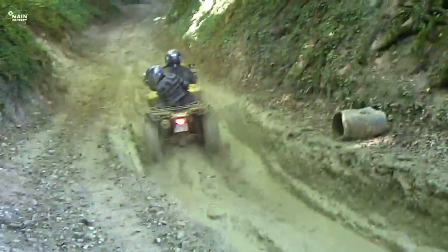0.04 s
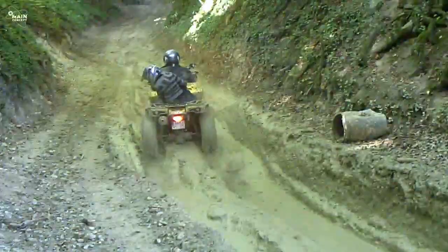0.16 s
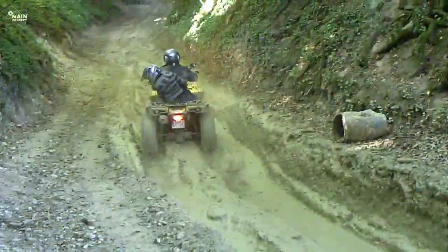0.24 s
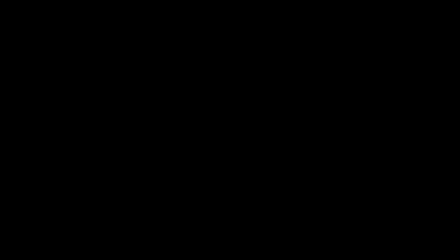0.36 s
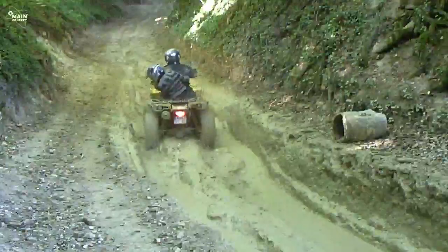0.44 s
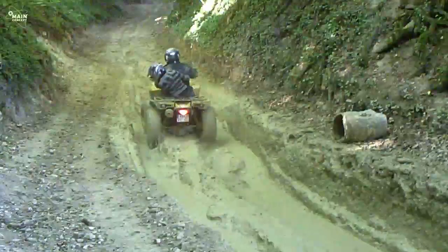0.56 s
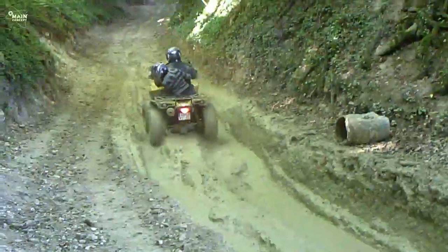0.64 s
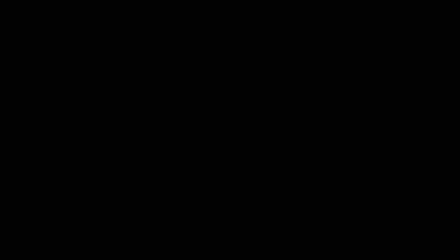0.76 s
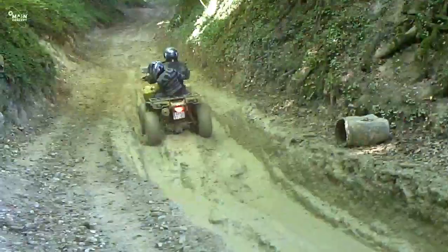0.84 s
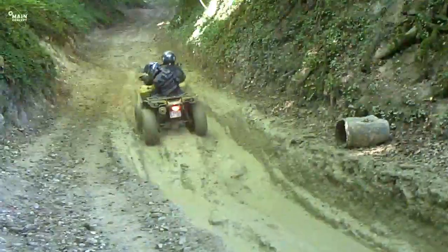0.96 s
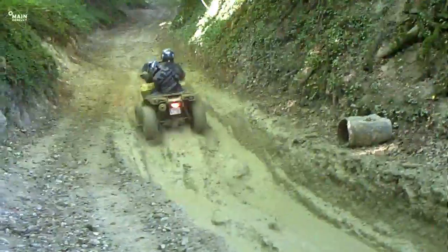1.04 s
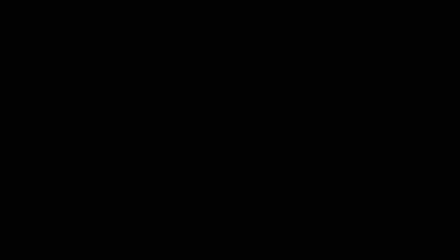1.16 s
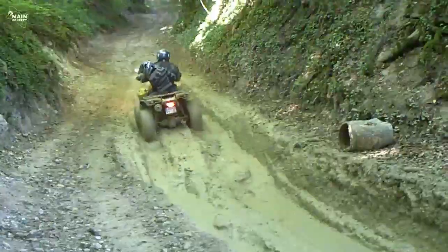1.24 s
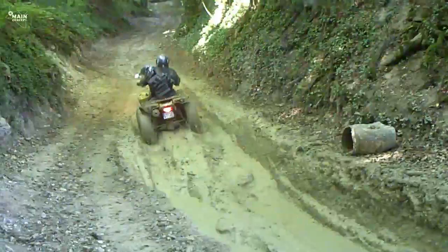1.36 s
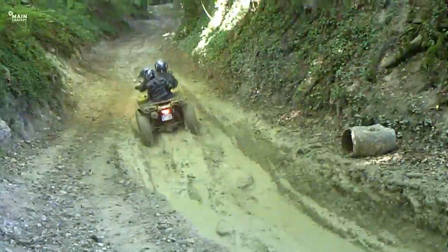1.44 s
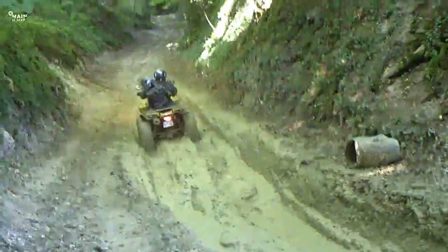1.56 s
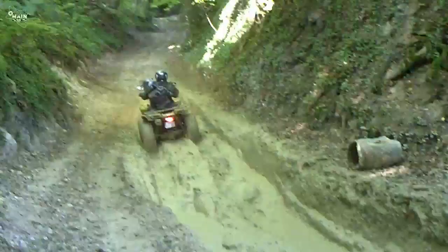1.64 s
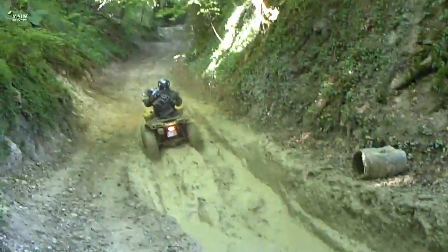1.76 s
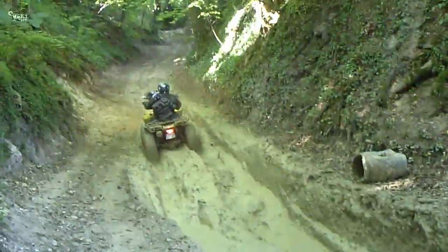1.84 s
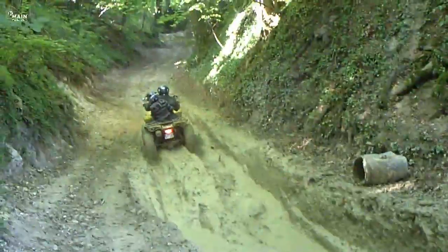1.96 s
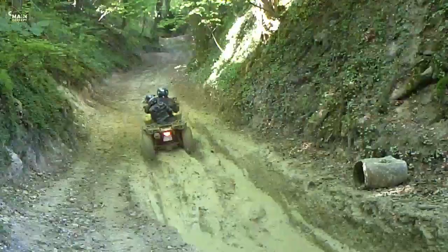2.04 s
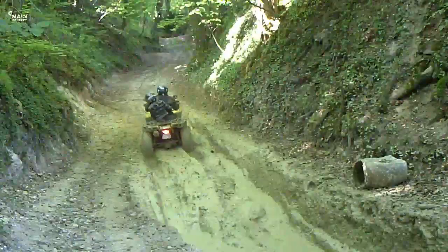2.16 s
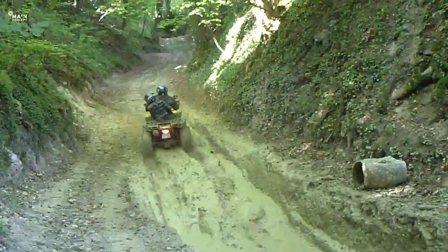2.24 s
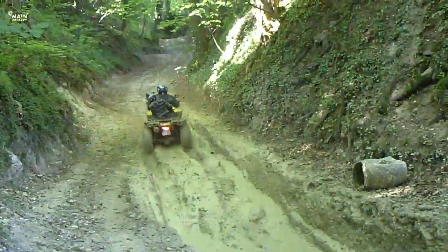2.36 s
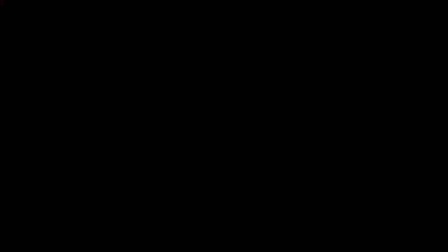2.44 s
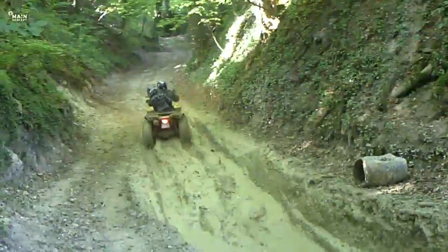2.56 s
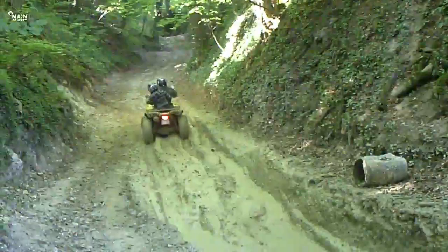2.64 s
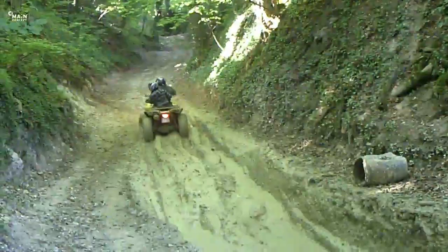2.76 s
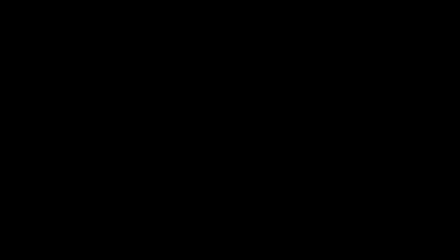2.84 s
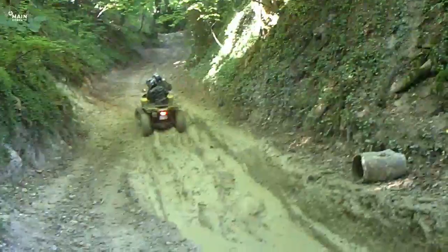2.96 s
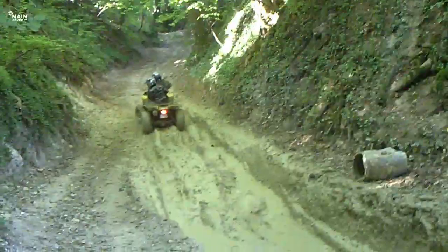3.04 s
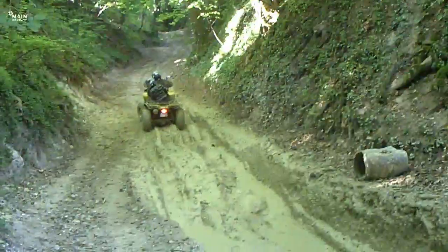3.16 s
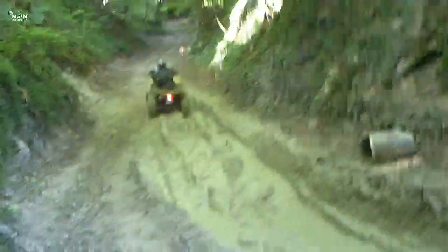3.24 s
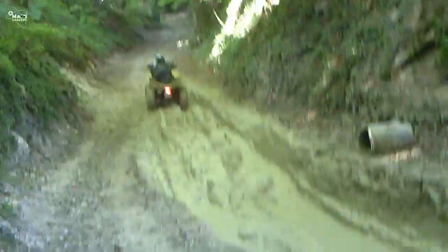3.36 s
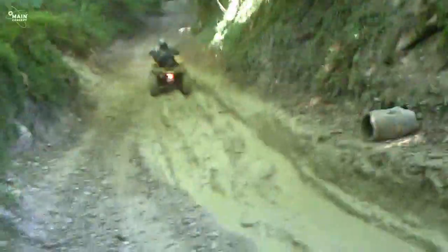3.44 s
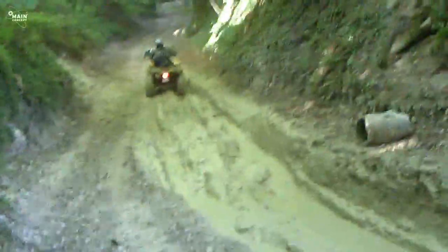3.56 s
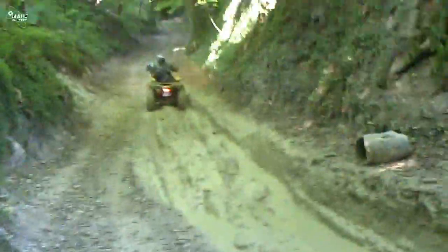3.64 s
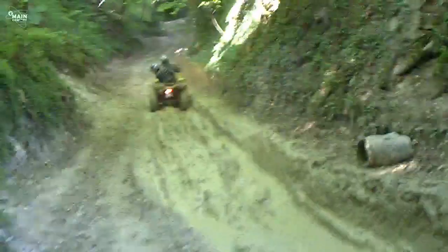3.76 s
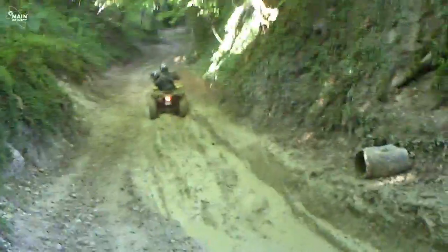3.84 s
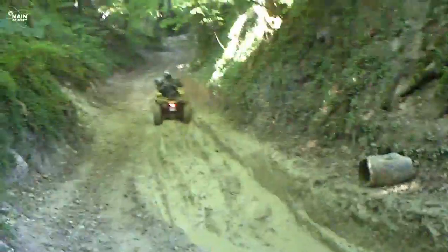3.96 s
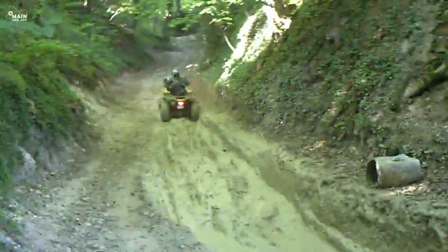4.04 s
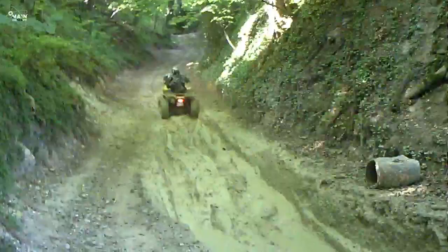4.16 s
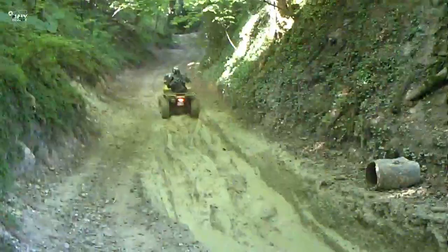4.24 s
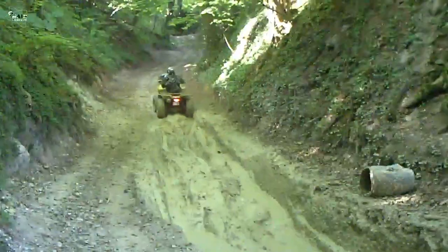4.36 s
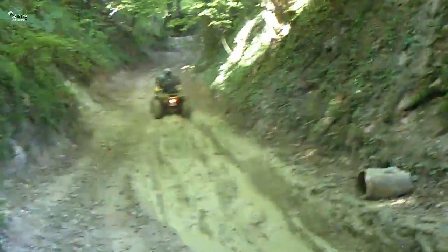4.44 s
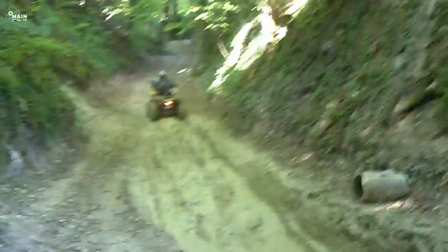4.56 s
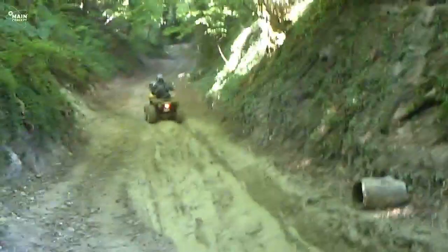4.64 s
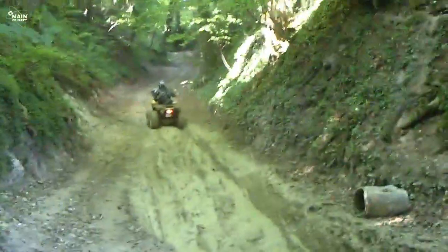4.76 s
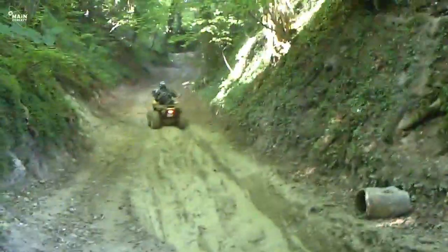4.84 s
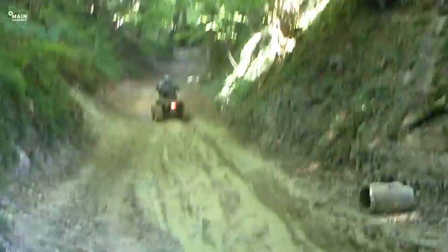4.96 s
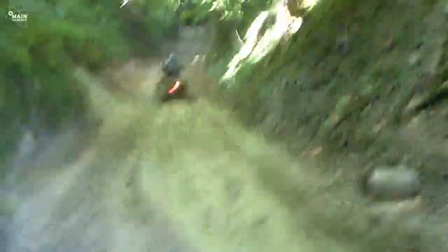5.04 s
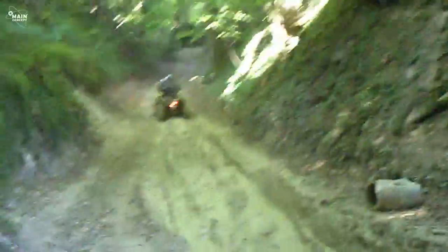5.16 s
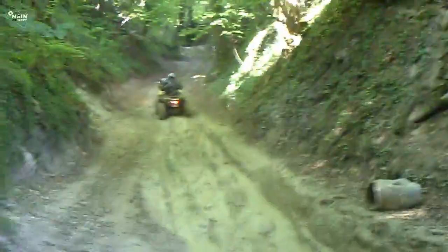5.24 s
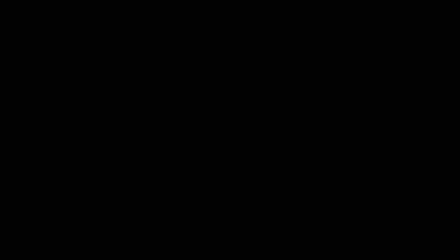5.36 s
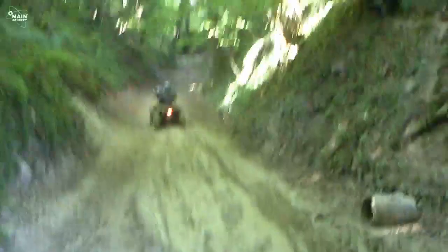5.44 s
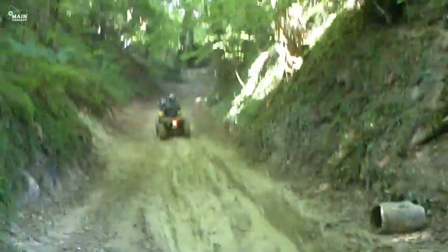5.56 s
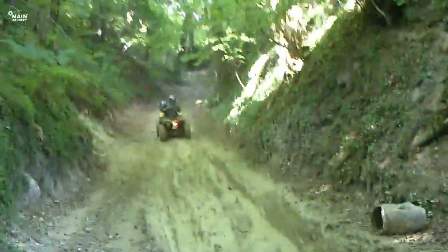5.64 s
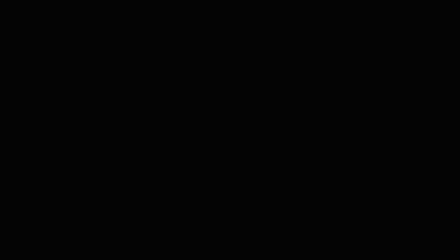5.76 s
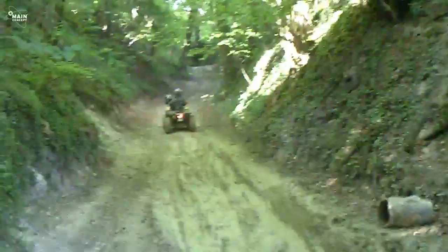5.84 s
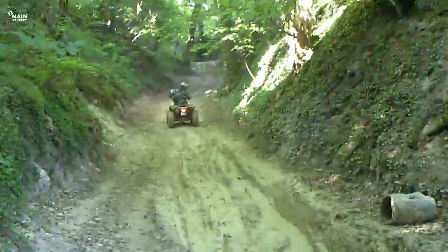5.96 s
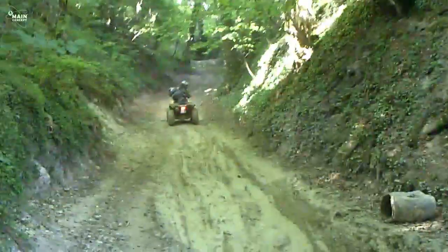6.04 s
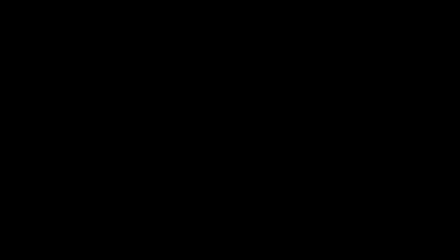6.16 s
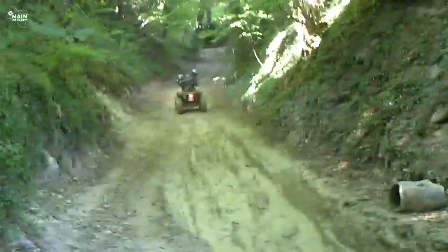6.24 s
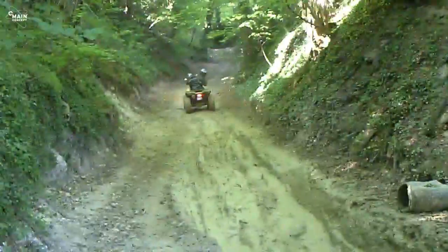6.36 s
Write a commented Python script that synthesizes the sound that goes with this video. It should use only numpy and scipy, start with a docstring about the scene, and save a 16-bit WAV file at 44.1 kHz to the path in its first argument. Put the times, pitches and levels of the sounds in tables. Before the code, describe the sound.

A quad bike pulls away through deep mud, close at first and gradually receding. Its low, throbbing engine starts at raised revs with a raspy exhaust bark, sags by 0.6 seconds, then climbs under load to a peak around 1.8 seconds. It settles to a steady chug from about 2.2 seconds and revs up again between 3.8 and 4.5 seconds, now quieter. From the start, the tyres throw surges of wet slush and hissing spray, with clods splatting, grit crunching and a low rolling rumble underneath. Flicked stones tick sharply and gravel knocks on the underside, most often between 2 and 3 seconds. The splats thin out after 3.3 seconds. Near 5.6 seconds the throttle shuts and the engine drops to a soft, uneven burble. At about 6.2 seconds a faint, thin whine rises far off, just before the end.

```python
"""A quad bike churns away through deep mud in a wooded gully, the throttle opening and closing.
From the start, each firing rings the exhaust and lets out a rasp of gas; the tyres fling mud and
flick stones, and gravel knocks on the underside. The clods thin out after 3.3 s as the bike recedes.
Near 5.6 s the throttle shuts and the engine burbles unevenly. At 6.2 s a faint whine rises far off."""
import sys
import numpy as np
from scipy import signal
from scipy.fft import rfft, irfft, next_fast_len
from scipy.io import wavfile

SR = 44100
rng = np.random.default_rng(int(sys.argv[2]) if len(sys.argv) > 2 else 0)


def store_wav(level_fs):
    """Save 16-bit WAV to argv[1]."""
    pcm = np.round(np.clip(np.atleast_2d(level_fs), -1, 1) * 32767)
    wavfile.write(sys.argv[1], SR, pcm.T.astype(np.int16))


N = 282681
TIME_S = np.arange(N) / SR
CRUISE_HZ = 26  # firing rate

# engine speed: time_s, firing_hz
FIRING_RATE = [(0, 35.2), (.12, 32.5), (.26, 28), (.5, 24.5), (.65, 23.8), (1.03, 28.2), (1.14, 28.5),
               (1.28, 32.6), (1.37, 31.7), (1.42, 31.7), (1.57, 33), (1.72, 35.9), (1.85, 35.9), (2, 32.5),
               (2.14, 27.9), (2.4, 26.3), (2.54, 25.7), (2.93, 26.7), (3.12, 26.4), (3.43, 24),
               (3.73, 24.7), (3.94, 29.3), (4.05, 30.2), (4.33, 31.4), (4.48, 30.2), (4.62, 27),
               (4.76, 25.1), (4.83, 24.8), (5.16, 24.1), (5.6, 22.7), (5.75, 20.2), (6, 19.1), (6.4, 20.9)]
# engine load, heard as boom strength: time_s, level_db
ENGINE_LOAD = [(0.0, -6), (0.13, -3.5), (0.28, 4), (0.55, 2.3), (0.7, 1.5), (0.88, 3.9), (1.15, 3),
               (1.3, 2), (1.5, 3), (1.7, -4), (1.88, -4.5), (2.08, -4), (2.3, -5), (2.8, -4), (3.3, -5.5),
               (3.72, -3.5), (4.0, -2.5), (4.3, -7.5), (4.65, -8.5), (5.05, -5.5), (5.5, -8.5), (5.7, -28)]
# boom: order, cruise_db, db_per_firing_hz, load_share
BOOM_ORDERS = [(1.0, -38, 0.7, 0.53), (2.0, -34, 0.57, 0.34), (3.0, -44, 2, 1.1), (4.0, -38.5, 1.07, 0.62),
               (5.0, -19, 0.15, 1.08), (6.0, -20.5, 0.16, 1.49), (7.0, -40, -0.74, 0.15),
               (8.0, -34.5, -1.18, 0.98)]
# extra gain of order 8: time_s, gain_db
OVERTONE_GAIN = [(0.0, 13.5), (0.3, -1.5), (0.5, -2.5), (0.85, 1), (1.5, -3), (2.1, 0), (2.3, 8), (3.2, 4),
                 (3.9, 8), (4.5, 5.5), (4.8, -3), (5.5, -6)]
# bark and hollow ring: order, cruise_db, db_per_firing_hz
BARK_ORDERS = [(9.0, -52.5, 0.02), (10.0, -45.5, -1.54), (11.0, -49.5, -0.32), (12.0, -49.5, -0.57),
               (13.0, -53.5, 2.5), (14.0, -53.5, 1.56), (15.0, -45, 1.3), (16.0, -43.5, 1),
               (17.0, -53.5, 2), (18.0, -48, 0), (19.0, -60.5, 4), (20.0, -55, 0), (21.0, -50, -2.5),
               (22.0, -54.5, -2.7)]
# exhaust bark: time_s, gain_db
BARK_GAIN = [(0.0, 12.5), (0.2, 8), (0.6, 0), (1.1, 4.5), (1.6, 6), (1.85, 10.5), (2.1, -3), (2.3, 1.5),
             (3.2, 1), (3.7, 0), (4.0, 5), (4.4, 6), (4.7, 1), (5.1, -0.5), (5.5, -5), (5.7, -14.5),
             (5.95, -34)]
# hollow ring above the bark: time_s, gain_db
HOLLOW_GAIN = [(0.0, -6), (0.3, 12.5), (0.6, 15.5), (1.0, 14.5), (1.2, -2), (1.45, 4), (1.85, -17.5),
               (2.1, -13), (3.2, -6.5), (3.55, 7.5), (3.8, 5), (4.3, -3), (4.7, -0.5), (5.1, 8.5),
               (5.5, -1), (5.7, -14), (5.95, -25)]
# pipe and silencer response: freq_hz, gain_db
SILENCER_RESPONSE = [(25.0, -7.62), (60.0, -3.4), (80.0, 2.34), (105.0, -2.67), (124.0, 0.06),
                     (140.0, -2.96), (170.0, -14.61), (192.0, -3.5), (209.0, 5.33), (222.0, 4.21), (232, 2),
                     (245.0, 4.05), (268, 3.8), (287, -3), (308, 5.5), (340.0, 8.06), (370.0, 7.67),
                     (400.0, 0.12), (430.0, -8.67), (455.0, -11.47), (485.0, -4.41), (510.0, -4.29),
                     (545.0, -5.05), (580.0, -7.93), (660.0, -12.65), (780.0, 12.78)]
# gas rasp, with the microphone's peak near 2.35 kHz: freq_hz, density_db
RASP_SPECTRUM = [(430, -2), (560, 1), (660, 0), (780, -1), (1000, 2), (1150, -12.5), (1350, -17),
                 (1750, -9), (2020, -16.5), (2350, -2), (2550, -12.5), (2800, -52), (4000, -58.5),
                 (11000, -80.5)]
# low gas puff: freq_hz, density_db
PUFF_SPECTRUM = [(70, -37), (150, -5.5), (230, -10.5), (300, -4.5), (385, -8), (445, -0.5), (510, -4.5),
                 (600, -21), (750, -16.5), (2000, -58)]
# uneven firings, throttle shut: start_s, level_db
BURBLE_FIRINGS = [(5.672, -23), (5.774, -26), (5.806, -20), (5.9, -32), (5.951, -25), (6.118, -24),
                  (6.194, -25), (6.282, -27.5), (6.375, -26.5)]
# rasp and mud at cruise, fading with distance: time_s, level_db
CHURN_LEVEL = [(0, -40), (.7, -41), (.95, -37.5), (1.15, -42), (1.75, -41.5), (2.4, -42), (3.6, -44),
               (4.15, -46.5), (4.4, -48.5), (4.7, -49), (5.38, -49), (5.5, -47.5), (5.62, -52.5),
               (6.4, -56.5)]
# big clods landing: start_s, level_db, pitch_hz
BIG_CLODS = [(0.05, -12.5, 980), (0.25, -15.5, 1030), (0.366, -24, 870), (0.405, -19, 990),
             (0.471, -15.5, 800), (0.607, -25, 990), (0.651, -21, 870), (0.732, -18, 960),
             (0.85, -15.5, 960), (0.963, -16, 990), (1.1, -13, 982), (1.175, -16.5, 980), (1.362, -19, 900),
             (1.461, -13, 980), (1.474, -10, 935), (1.529, -13.5, 800), (1.67, -10.5, 1020),
             (1.802, -13, 920), (1.82, -20, 860), (1.874, -18, 960), (1.943, -12, 980), (2.028, -12, 1040),
             (2.132, -15.5, 930), (2.197, -16, 1100), (2.297, -21, 1050), (2.403, -9, 1040),
             (2.759, -20, 830), (3.041, -21, 940), (3.148, -22, 980), (3.266, -16.5, 1036),
             (3.816, -14, 915), (4.138, -13, 810), (4.295, -25, 885), (4.315, -30, 1000), (4.425, -23, 840),
             (4.62, -29, 940), (4.868, -25.5, 780), (5.872, -33, 740)]
# spray hiss and valve ticks: time_s, level_db
HISS_LEVEL = [(0.0, -48.5), (0.16, -53.5), (0.68, -55.5), (0.95, -52.5), (1.18, -55), (1.68, -52.5),
              (2.05, -56), (2.55, -60), (2.82, -57.5), (3.36, -62), (3.62, -61.5), (3.91, -59.5),
              (4.3, -60.5), (4.59, -64), (5.36, -64), (5.53, -66), (5.69, -71), (6.41, -73.5)]
# spray hiss and valve ticks, with the microphone's narrow treble peaks: freq_hz, density_db
HISS_SPECTRUM = [(2000, -7.5), (2800, 1.5), (3200, 1), (3700, 2), (4200, -0.5), (5200, -1), (6400, -6),
                 (8330, -17.5), (8660, -7), (8970, -14.5), (9600, -22), (10000, -18), (10600, -36.5),
                 (11500, -41.5), (12050, -22.5), (12700, -33), (13400, -15), (13900, -28), (15600, -34)]
# tyres spinning up: centre_s, length_s, gain_db
SLUSH_SURGES = [(0.023, 0.077, -0.5), (.15, 0.057, -3), (0.375, 0.31, 0.5), (1.012, 0.075, -9),
                (1.474, 0.23, -3), (1.796, 0.16, -1.5), (2.278, 0.16, -0.5), (2.443, 0.088, 1),
                (2.726, .06, -2.5), (3.156, 0.059, -14), (3.842, 0.069, 1), (4.14, 0.069, -2),
                (4.322, 0.057, -0.5), (4.616, 0.035, -11), (5.488, 0.061, -22)]
# thrown slush: freq_hz, density_db
SLUSH_SPECTRUM = [(450, -16), (600, -6), (750, 0), (1020, 3.5), (1300, -4), (1900, -11.5), (2400, -7.5),
                  (2800, -25.5), (5500, -22.5), (9000, -41), (11000, -68.5)]
# gravel on the underside: start_s, level_db, pitch_hz
GRAVEL_KNOCKS = [(0.609, -20, 1770), (1.073, -20, 1300), (1.147, -26, 1290), (1.493, -25, 1360),
                 (1.598, -21, 1300), (2.043, -13, 1320), (2.073, -23, 1300), (2.279, -31, 1650),
                 (2.2972, -15, 1520), (2.381, -31, 1810), (2.405, -21, 1640), (2.449, -20, 1500),
                 (2.477, -23, 1140), (2.506, -21, 1200), (2.594, -24, 1360), (2.6472, -24, 1740),
                 (2.832, -20.5, 1510), (2.922, -24, 1300), (3.123, -22, 1290), (3.3898, -22, 1280),
                 (3.481, -23.5, 1410), (3.735, -34, 1280), (3.813, -21, 1330), (3.96, -28, 1220),
                 (4.296, -26, 1250), (5.0335, -26, 1730), (5.26, -39, 1440), (5.578, -37.5, 1200),
                 (5.87, -38, 1170)]
# flicked stones: start_s, level_db
STONE_TICKS = [(0.0745, -28), (0.2314, -19.5), (0.4165, -33), (0.4685, -32), (0.9702, -23.5), (1.2085, -35),
               (1.7194, -29), (2.2315, -36), (2.7225, -36), (2.8165, -36), (3.3065, -41), (3.8125, -36),
               (3.925, -32), (4.1095, -38), (4.1635, -38), (4.2946, -25.5), (4.4895, -35.5), (5.034, -32),
               (5.117, -37), (5.157, -39), (5.2195, -44), (5.2535, -43), (5.2815, -43), (5.3565, -41),
               (5.9635, -50)]
# breaking grit: freq_hz, density_db
CRUNCH_SPECTRUM = [(600, -26), (900, 0), (1300, 1), (1900, 0.5), (2400, -2), (2900, -17.5), (6000, -26.5),
                   (11000, -60.5)]
# tyre and chassis rumble: freq_hz, density_db
RUMBLE_SPECTRUM = [(15, -33), (28, 0), (40, 1), (58, -3), (80, 1.5), (110, 4.5), (160, -6), (205, -4),
                   (260, -15), (350, -14), (600, -26), (1500, -78)]
# far whine: time_s, pitch_hz, level_db
WHINE_GLIDE = [(6.23, 840, -80), (6.28, 880, -58), (6.34, 965, -55), (6.41, 1040, -54)]


def exhaust(firing_hz, cycle, load_db, bark_db, uneven_db=0.23, jitter_turns=0.0022):
    """Each firing booms, then barks, later at light load; no two are quite alike."""
    lag_turns = np.interp(load_db, [-11, 1], [.43, .3])
    cycle = cycle + jitter_turns * drift(25)
    low = from_db(uneven_db * drift(26)) * boom(firing_hz, cycle, load_db)
    high = from_db(uneven_db * drift(26)) * bark(firing_hz, cycle - lag_turns, bark_db)
    return low + high


def boom(firing_hz, cycle, load_db):
    """Low orders follow the load and swell as the revs carry them through the silencer's peaks."""
    orders = np.arange(len(BOOM_ORDERS)) + 1
    _, cruise_db, db_per_hz, load_share = np.transpose(BOOM_ORDERS)[:, :, None]
    db = cruise_db + db_per_hz * (firing_hz - CRUISE_HZ) + load_share * load_db
    db += silencer_db(orders[:, None] * firing_hz)
    db[-1] += in_time(OVERTONE_GAIN)[0]
    return pulse_train(orders, db, cycle, rough=0.056, echo_share=0.13)


def bark(firing_hz, cycle, bark_db, split_hz=445):
    """High orders sweep the pipe's resonances: a bark below split_hz, a hollow ring above."""
    orders = np.arange(len(BARK_ORDERS)) + len(BOOM_ORDERS) + 1
    _, cruise_db, db_per_hz = np.transpose(BARK_ORDERS)[:, :, None]
    hz = orders[:, None] * firing_hz
    hollow_share = np.clip((hz - split_hz) / 30 + .5, 0, 1)
    db = cruise_db + db_per_hz * (firing_hz - CRUISE_HZ) + silencer_db(hz)
    db += (1 - hollow_share) * bark_db + hollow_share * in_time(HOLLOW_GAIN)[0]
    return pulse_train(orders, db, cycle, rough=.1, echo_share=.33, smear_rad=.05)


def pulse_train(orders, db, cycle, rough, echo_share, smear_rad=0):
    """One pulse per cycle; like a resonator, it starts sharply and rings out (minimum phase)."""
    hop, size = 200, 64
    floor_db = db[:, ::hop].max(axis=0) - 24
    spectrum_db = np.tile(floor_db, (size // 2 + 1, 1))
    spectrum_db[orders] = np.maximum(db[:, ::hop], floor_db)
    cepstrum = irfft(np.log(from_db(spectrum_db)), axis=0)[:size // 2]
    phase_rad = np.imag(rfft(2 * cepstrum, size, axis=0))
    bins = np.arange(len(phase_rad))[:, None]
    # orders below 16 leave the pipe later: a downward sweep
    phase_rad += smear_rad * np.minimum(bins - 16, 0) ** 2
    # part of the pulse comes half a cycle later, on the crank's other turn
    phase_rad += np.arctan(echo_share) * (-1) ** bins
    out = np.zeros(N)
    for order, level_db in zip(orders, db):
        angle_rad = 2 * np.pi * order * cycle + np.interp(TIME_S, TIME_S[::hop], phase_rad[order])
        out += from_db(level_db) * (1 + rough * drift(16)) * np.cos(angle_rad)
    return out


def silencer_db(hz):
    """Pipe and silencer gain at hz."""
    points_hz, db = np.transpose(SILENCER_RESPONSE)
    return np.interp(np.log(hz), np.log(points_hz), db)


def gas_rush(cycle, churn_db, bark_db, rasp_db=-2, flutter_db=2.35, puff_db=-53):
    """Gas rushes out after each firing: a fluttering, microphone-coloured rasp over a low puff."""
    rasp = from_db(churn_db + rasp_db + flutter_db * drift(35)) * noise(RASP_SPECTRUM)
    puff = from_db(bark_db + puff_db) * noise(PUFF_SPECTRUM)
    return firing_gate(cycle, sharpness=0.21, delay_turns=0.19) * (rasp + puff)


def valve_tick(cycle, hiss_db, gain_db=-6):
    """A short bright valve tick sounds with each firing."""
    gate = firing_gate(cycle, sharpness=4, delay_turns=0.064)
    return from_db(hiss_db + gain_db) * gate * noise(HISS_SPECTRUM)


def burble(gain_db=-7, deep_db=-5, knock_db=-12):
    """Lone weak firings thud in the pipe's lowest resonances and knock in the silencer."""
    pops = clicks_at(BURBLE_FIRINGS)
    thud = from_db(deep_db) * ring(pops, hz=83, t60_s=0.15) + ring(pops, hz=108, t60_s=0.2)
    knock = from_db(knock_db) * ring(pops, hz=352, t60_s=0.062)
    return from_db(gain_db) * (thud + knock)


def splats(churn_db, small_per_s=5, until_s=3.3, small_db=14, spread_db=3.5, pitch_hz=(800, 1088)):
    """Clods slap the puddle and trap air that rings; small ones fall at random among the big."""
    when, size, pitch = rng.random((int(small_per_s * until_s), 3)).T
    start_s = when * until_s
    level_db = np.interp(start_s, TIME_S, churn_db) + small_db + spread_db * (2 * size - 1)
    small_clods = zip(start_s, level_db, np.interp(pitch, [0, 1], pitch_hz))
    return hits([*BIG_CLODS, *small_clods], ring_db=-8.5, ring_t60_s=0.023, slap_db=-21)


def mud_patter(churn_db, gain_db=-5, pitches=16):
    """Small lumps patter down, each a short wet ring."""
    lumps = grains(per_s=700 * from_db(2 * drift(9)), spread_db=3.5)
    pitch_index = rng.integers(0, pitches, N)
    patter = sum(ring(lumps * (pitch_index == k), hz, t60_s=8 / hz) / hz ** 0.84
                 for k, hz in enumerate(np.geomspace(720, 2400, pitches)))
    return from_db(churn_db + gain_db) * rms_one(patter)


def spray(hiss_db, gain_db=0.86, drop_share=0.78, flutter_db=1):
    """Fine drops hiss off the tyres in spurts."""
    drops = rms_one(grains(per_s=1500, spread_db=5) * from_db(4 * drift(45)))
    hiss = colour(rng.standard_normal(N) + drop_share * drops, HISS_SPECTRUM)
    return from_db(hiss_db + gain_db - flutter_db * drift(130)) * hiss


def slush(churn_db, gain_db=-2, flutter_db=2):
    """Spinning tyres throw dense, lumpy surges of wet grit."""
    swell = sum(from_db(db) * np.exp(-2 * ((TIME_S - centre_s) / length_s) ** 2)
                for centre_s, length_s, db in SLUSH_SURGES)
    envelope = from_db(churn_db + gain_db + flutter_db * drift(70)) * swell
    return envelope * colour(grains(per_s=3000, spread_db=5), SLUSH_SPECTRUM)


def gravel(bounce_s=0.0057, bounce_loss_db=11):
    """Gravel strikes the underside with a dry knock and bounces once."""
    scatter = rng.uniform(.75, 1.25, (len(GRAVEL_KNOCKS), 2))
    bounces = [(start_s + bounce_s * stretch, db - bounce_loss_db, hz * detune)
               for (start_s, db, hz), (stretch, detune) in zip(GRAVEL_KNOCKS, scatter)]
    return hits([*GRAVEL_KNOCKS, *bounces], ring_db=-7.5, ring_t60_s=.012, slap_db=-10)


def stones(gain_db=15, band_hz=(700, 4000), grit_db=-21, grit_t60_s=.014):
    """Flicked stones tick sharply, each trailing wet grit."""
    age_s = np.arange(SR // 20) / SR
    grit = from_db(grit_db - 60 * age_s / grit_t60_s) * rng.standard_normal(len(age_s))
    ticks = signal.fftconvolve(clicks_at(STONE_TICKS), (age_s == 0) + grit)[:N]
    band = signal.butter(2, band_hz, "band", fs=SR, output="sos")
    return from_db(gain_db) * signal.sosfilt(band, ticks)


def crunch(churn_db, gain_db=-9, per_s=900, decay_s=.0008):
    """Grit crackles under the tread, each grain a tiny noise burst."""
    age_s = np.arange(SR // 100) / SR
    cracks = grains(per_s * from_db(2 * drift(20)), spread_db=3.5)
    power = signal.fftconvolve(cracks ** 2, np.exp(-2 * age_s / decay_s))[:N]
    crackle = np.sqrt(np.abs(power)) * rng.standard_normal(N)
    return from_db(churn_db + gain_db) * colour(crackle, CRUNCH_SPECTRUM)


def rumble(near_db=-35, far_db=-39):
    """Tyres and chassis roll low, sinking with distance."""
    return from_db(np.linspace(near_db, far_db, N)) * noise(RUMBLE_SPECTRUM)


def whine(waver=0.0068, halo_share=.6, halo_hz=60):
    """A thin, unsteady rising tone in a narrow halo of noise."""
    hz, db = in_time(WHINE_GLIDE)
    phase_rad = 2 * np.pi * np.cumsum(hz * (1 + waver * drift(130))) / SR
    tone = np.sin(phase_rad) + halo_share * drift(2 * halo_hz) * np.cos(phase_rad)
    started = TIME_S > WHINE_GLIDE[0][0]
    return from_db(db) * started * np.sqrt(2) * tone


def hits(rows, ring_db, ring_t60_s, slap_db, slap_t60_s=0.014, attack_s=0.00045):
    """A noisy slap and a pitched ring per row."""
    out, age_s = np.zeros(N + SR), np.arange(SR // 10) / SR
    band = signal.butter(4, [650, 2200], "band", fs=SR, output="sos")
    attack = 1 - np.exp(-age_s / attack_s)
    for start_s, db, hz in rows:
        slap = rms_one(signal.sosfilt(band, rng.standard_normal(len(age_s))))
        slap *= from_db(slap_db - 60 * age_s / slap_t60_s)
        tone = np.sin(2 * np.pi * hz * age_s) * from_db(ring_db - 60 * age_s / ring_t60_s)
        at = int(start_s * SR)
        out[at:at + len(age_s)] += from_db(db) * (slap + tone) * attack
    return out[:N]


def firing_gate(cycle, sharpness, delay_turns):
    """One swell per firing; rms 1."""
    return rms_one(np.exp(sharpness * np.cos(2 * np.pi * (cycle - delay_turns))))


def ring(clicks, hz, t60_s):
    """Each click starts a decaying sine."""
    radius, step_rad = from_db(-60 / (t60_s * SR)), 2 * np.pi * hz / SR
    feedback = [1, -2 * radius * np.cos(step_rad), radius * radius]
    return signal.lfilter([0, np.sin(step_rad)], feedback, clicks + 1e-18)


def clicks_at(rows):
    """One click per row."""
    out = np.zeros(N)
    for start_s, db in rows:
        out[int(np.clip(start_s * SR, 0, N - 1))] = from_db(db)
    return out


def grains(per_s, spread_db):
    """Random clicks of uneven size and sign."""
    sizes = from_db(spread_db * np.minimum(rng.exponential(1, N), 4)) * rng.choice([-1, 1], N)
    return sizes * (rng.random(N) < per_s / SR)


def noise(spectrum):
    """Shaped Gaussian noise; rms 1."""
    return colour(rng.standard_normal(N), spectrum)


def colour(x, spectrum):
    """Filter by a spectrum on a log-frequency axis; rms 1."""
    hz, db = np.transpose(spectrum)
    size = next_fast_len(N)
    bins_hz = np.maximum(np.fft.rfftfreq(size, 1 / SR), 1)
    gain = from_db(np.interp(np.log(bins_hz), np.log(hz), db))
    return rms_one(irfft(rfft(x, size) * gain, size)[:N])


def drift(per_s):
    """Random wander; spread about 1."""
    return np.interp(TIME_S * per_s, np.arange(2000), rng.standard_normal(2000))


def in_time(rows):
    """One piecewise-linear curve per value column."""
    time_s, *columns = np.transpose(rows)
    return [np.interp(TIME_S, time_s, column) for column in columns]


def from_db(db):
    """Decibels to gain."""
    return 10 ** (np.asarray(db) / 20)


def rms_one(x):
    """Scale to unit rms."""
    return x / np.sqrt(np.mean(x ** 2) + 1e-20)


def scene(churn_db_per_hz=.5):
    """Engine, ground and whine in mono; tyre churn and gas flow follow revs and distance."""
    firing_hz, = in_time(FIRING_RATE)
    load_db, = in_time(ENGINE_LOAD)
    bark_db, = in_time(BARK_GAIN)
    hiss_db, = in_time(HISS_LEVEL)
    churn_db = in_time(CHURN_LEVEL)[0] + churn_db_per_hz * (firing_hz - CRUISE_HZ)
    cycle = np.cumsum(firing_hz) / SR - .25  # one turn per firing
    engine = exhaust(firing_hz, cycle, load_db, bark_db) + burble()
    gas = gas_rush(cycle, churn_db, bark_db) + valve_tick(cycle, hiss_db)
    mud = mud_patter(churn_db) + spray(hiss_db) + slush(churn_db)
    ground = crunch(churn_db) + splats(churn_db) + gravel() + stones() + rumble()
    return (engine + gas + mud + ground + whine())[None]


def record(dry):
    """Steep low-pass."""
    cutoff_hz = 15700
    return signal.sosfilt(signal.ellip(10, .2, 80, cutoff_hz, fs=SR, output="sos"), dry)


dry = scene()
out = record(dry)
store_wav(out)
```